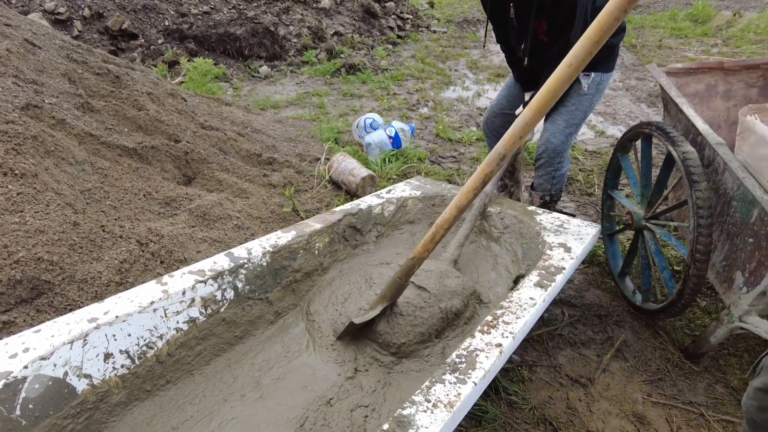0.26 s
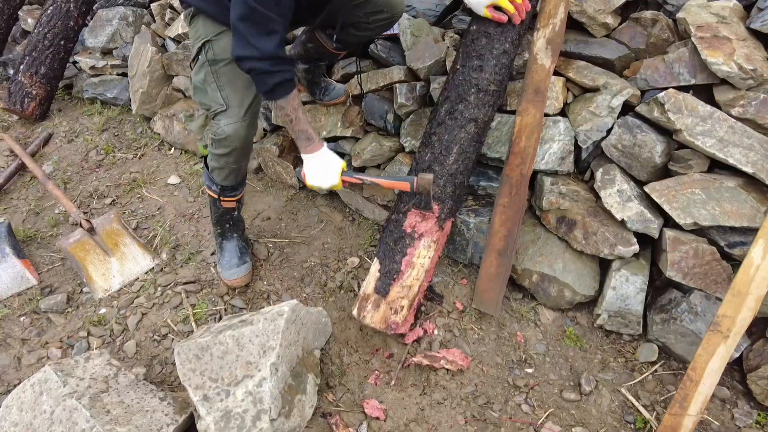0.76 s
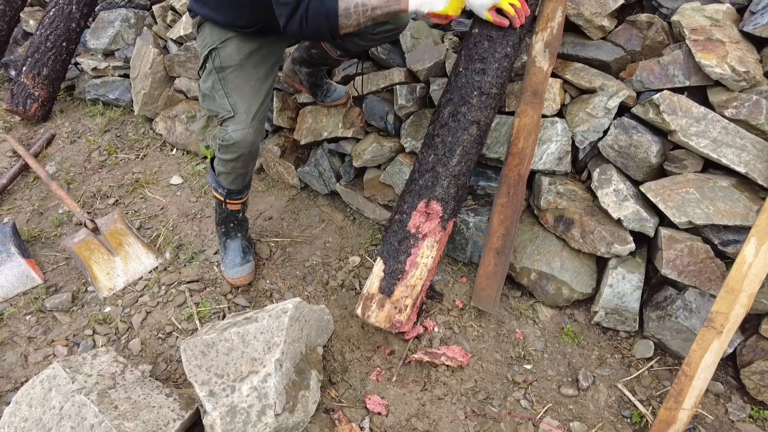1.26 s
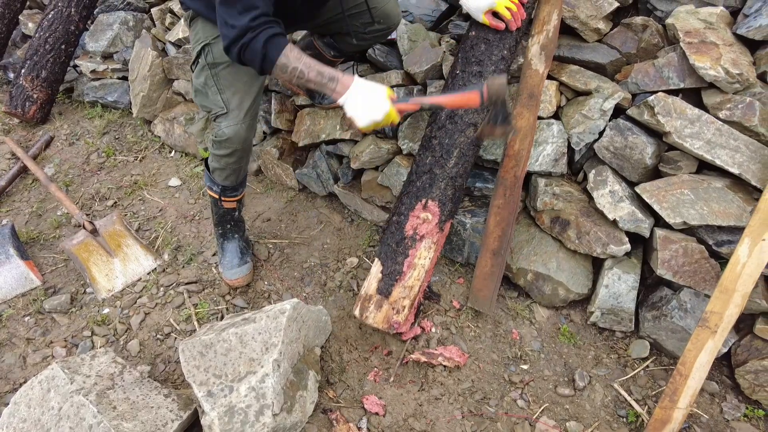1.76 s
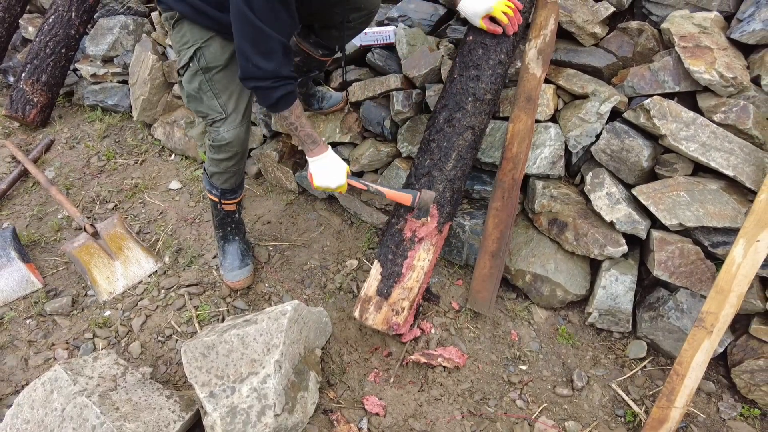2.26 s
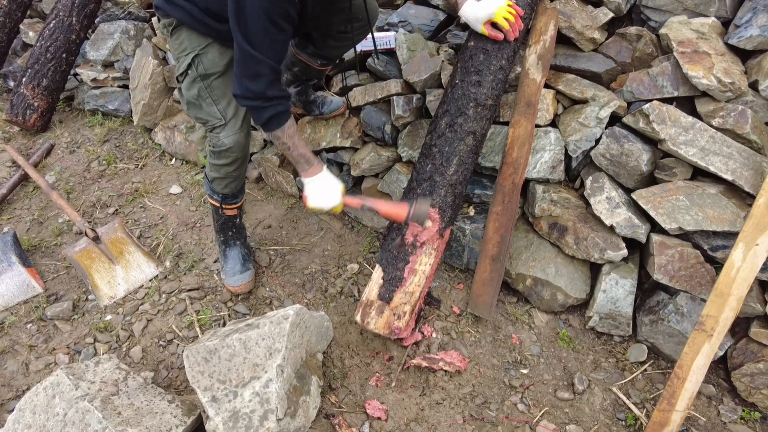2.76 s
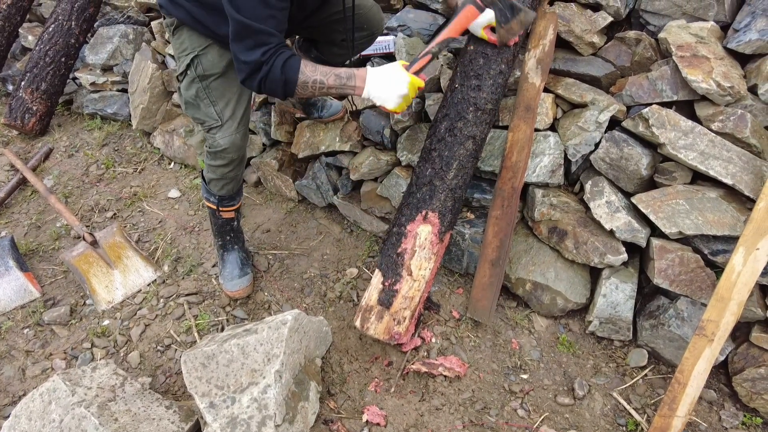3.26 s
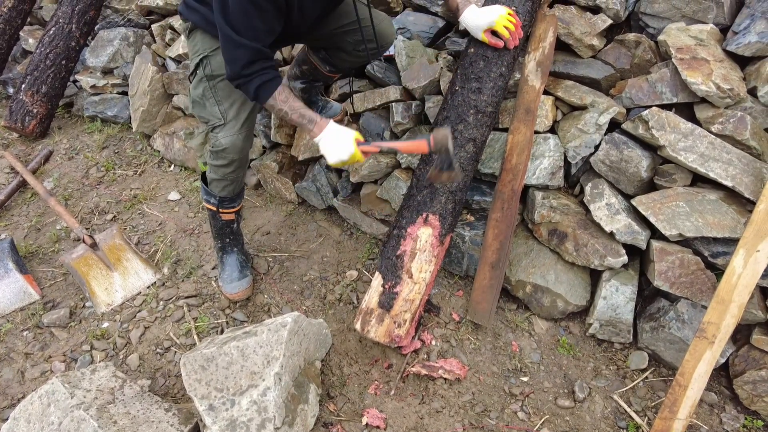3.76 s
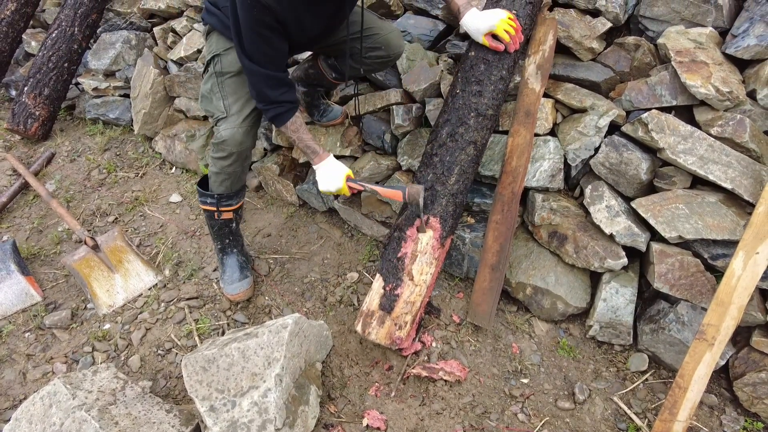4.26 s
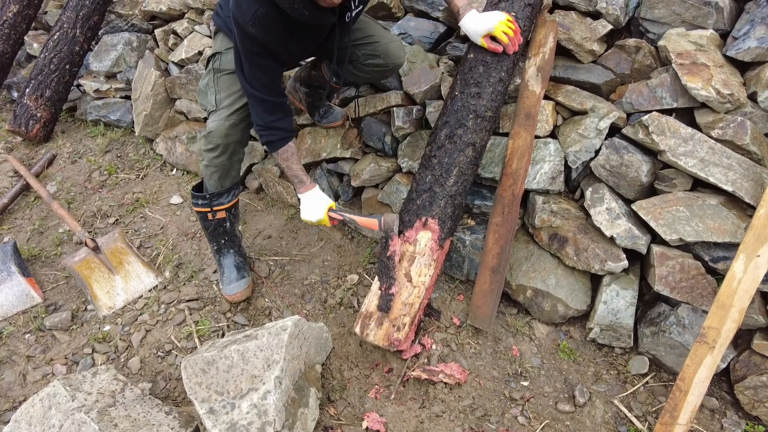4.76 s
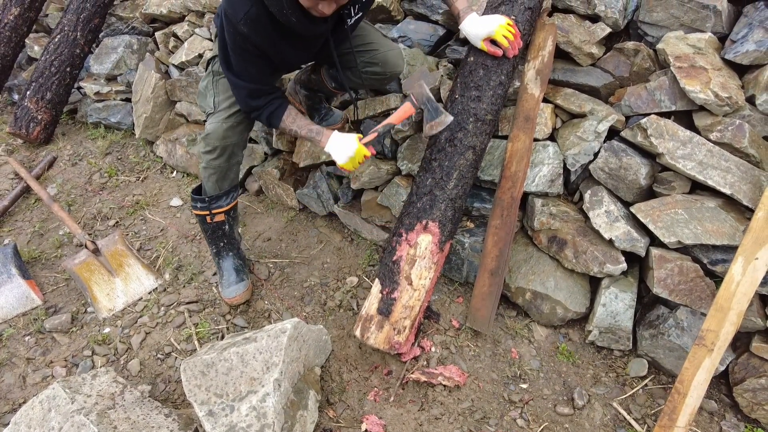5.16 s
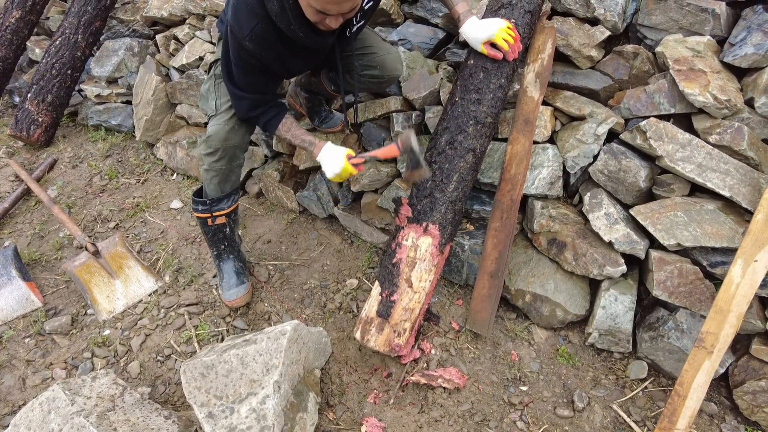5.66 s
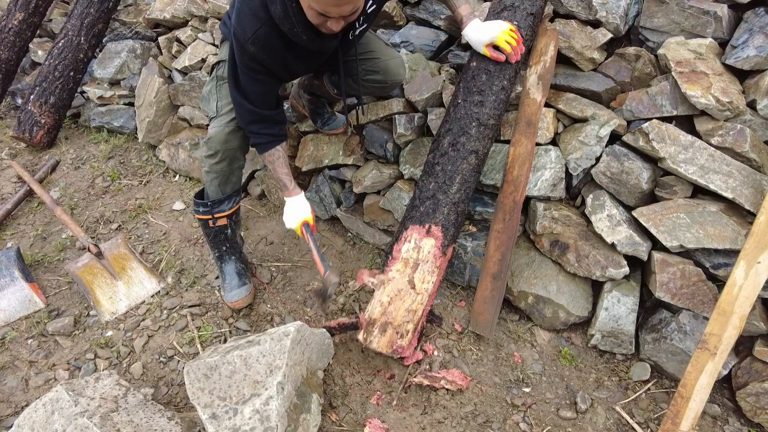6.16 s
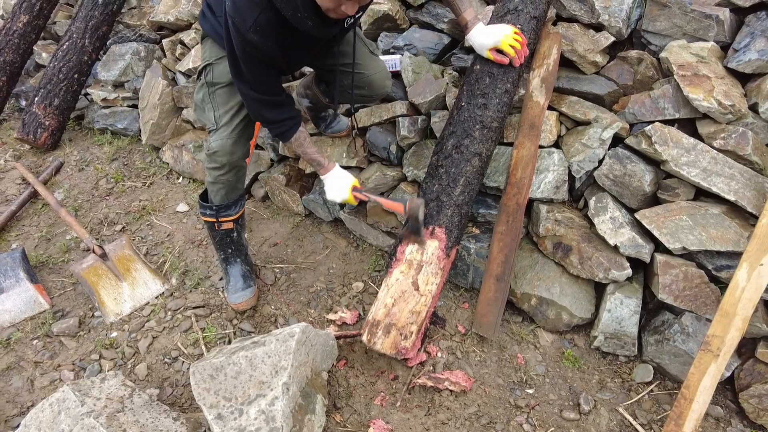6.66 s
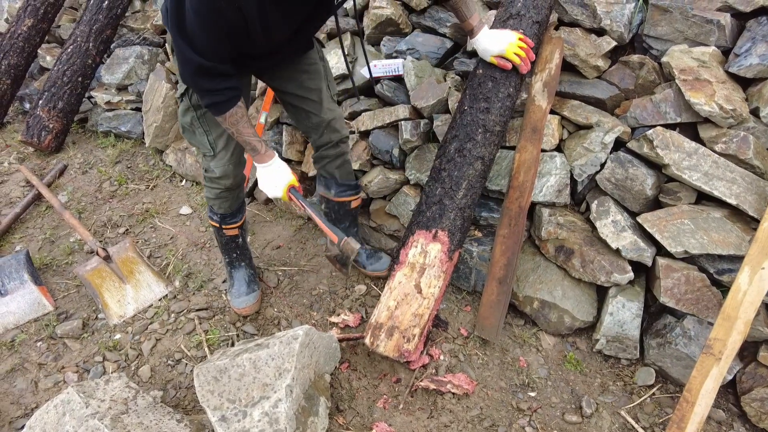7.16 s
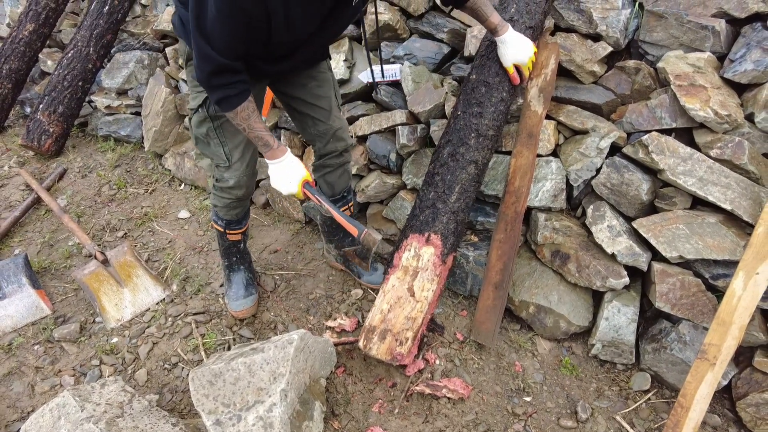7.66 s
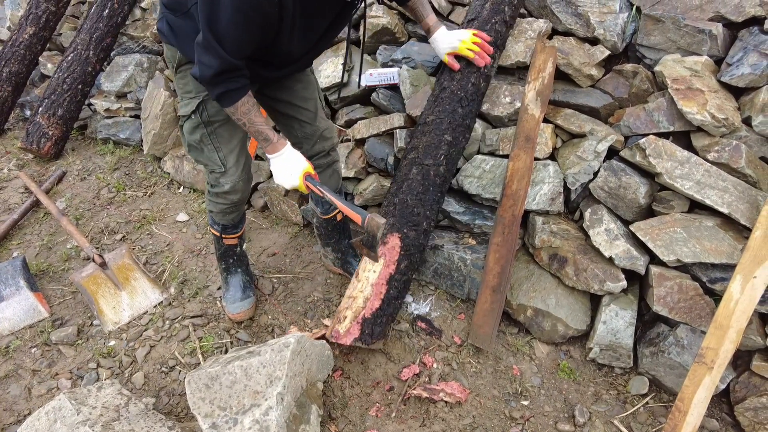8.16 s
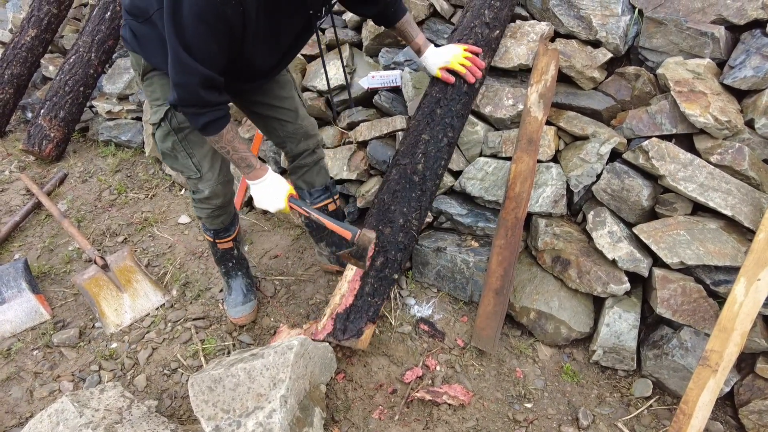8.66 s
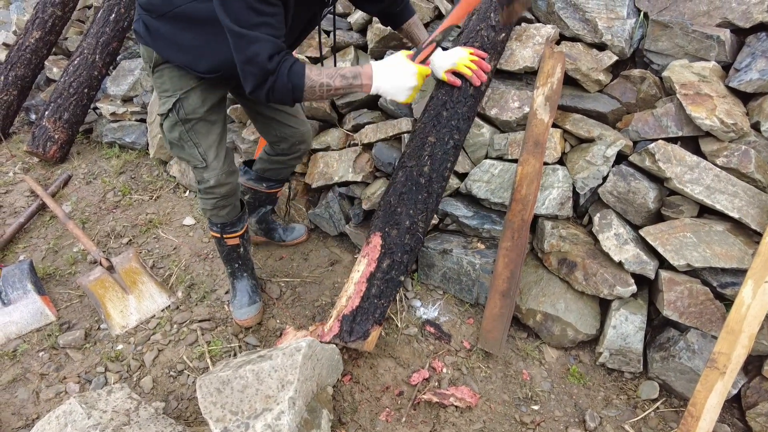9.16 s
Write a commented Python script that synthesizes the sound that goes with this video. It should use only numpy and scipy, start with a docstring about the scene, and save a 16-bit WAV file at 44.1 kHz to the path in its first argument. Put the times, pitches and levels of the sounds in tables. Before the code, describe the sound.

A brief wet scrape of cement in a tub, then a hatchet knocks bark off a log outdoors, its steel head twice ringing brightly.

```python
"""A hatchet chops bark off a log outdoors, after a short opening scene of a shovel in a steel tub of wet cement.
Each chop is a knock of ringing wood modes plus a noisy bark crunch; on stone or in a late chop the steel head rings.
Chips, crumbs, swishes and the log turning over at the end are shaped noise, as are wind and a dull background hiss.
Stones and ground scatter the sound in short noise tails; a far wall sends back one late, thin echo."""
import sys
import numpy as np
from scipy import signal
from scipy.fft import rfft, irfft, next_fast_len
from scipy.io import wavfile
from scipy.ndimage import uniform_filter1d, map_coordinates

SR = 44100
rng = np.random.default_rng(int(sys.argv[2]) if len(sys.argv) > 2 else 0)


def store_pcm(level_fs):
    """Save levels as 16-bit WAV."""
    pcm = np.round(np.clip(level_fs, -1, 1) * 32767).astype(np.int16)
    wavfile.write(sys.argv[1], SR, np.atleast_2d(pcm).T)


N = 414981


def amp(db):
    """Turns decibels into a plain multiplier."""
    return 10 ** (np.asarray(db) / 20)


def unit(x):
    """Scales a sound to an rms of 1."""
    return x / np.sqrt(np.mean(x ** 2) + 1e-20)


def along(points, hz):
    """Reads a curve of (pitch_hz, value) points on a log pitch axis."""
    f, v = np.transpose(points)
    return np.interp(np.log(hz + 1), np.log(f + 1), v)


def curves(rows):
    """One value per sample for each column after the time."""
    s, *cols = np.transpose(rows)
    return [np.interp(np.arange(N) / SR, s, c) for c in cols]


def wobble(rate, size=N):
    """A smooth random curve with rate knots a second."""
    knots = rng.standard_normal(int(size * rate / SR) + 4)
    return map_coordinates(knots, [np.arange(size) * rate / SR])


def filtered(x, response):
    """Multiplies the spectrum of x by a response of frequency."""
    m = next_fast_len(len(x) + 8192)
    hz = np.fft.rfftfreq(m, 1 / SR)
    return irfft(rfft(x, m) * response(hz), m)[:len(x)]


def hiss(spectrum, size=N, grain_db=3, grain_rate=800, patchy_db=0):
    """Coloured noise of rms 1, broken into grains in time and, if asked, into patches of pitch."""
    noise = amp(grain_db * wobble(grain_rate, size)) * rng.standard_normal(size)
    if patchy_db:
        z = signal.stft(noise, nperseg=256)[2]
        field = uniform_filter1d(rng.standard_normal(z.shape), size=4, axis=0)  # blur over pitch
        field = uniform_filter1d(field, size=14, axis=1)  # blur over time
        noise = signal.istft(z * amp(patchy_db * unit(field)), nperseg=256)[1][:size]
    return unit(filtered(noise, lambda hz: amp(along(spectrum, hz))))


def ring(modes, t, scatter_db, detune=0):
    """Fading sine tones, each at a new strength and, if asked, a slightly new pitch."""
    total = 0
    for hz, db, t60 in modes:
        strength = amp(db + rng.normal(0, scatter_db) - 60 * t / t60)
        total = total + strength * np.sin(2 * np.pi * hz * rng.normal(1, detune) * t)
    return total


def add(track, s, sound):
    """Mixes a sound in at time s."""
    part = track[round(s * SR):][:len(sound)]
    part += sound[:len(part)]


# cement sliding along the tub: time_s, rumble_db, grit_db
TUB = [(0, -43, -55), (.06, -52.5, -63), (.2, -56, -67), (.36, -59.5, -67.5), (.45, -61.5, -68.5),
       (.575, -50, -59.5)]
# tone of the rumble, then of the sandy grit: pitch_hz, relative_level_db
SLURRY = [(40, -18), (134, -10.5), (216, 0), (340, -5), (640, -23), (1200, -51)]
GRIT = [(350, -43.5), (700, -5), (2800, -9.5), (4000, -16.5), (8400, -21), (16000, -47.5)]
# a brief narrow hiss near 6 kHz: pitch_hz, width_hz, level_db (before the response is squared)
NARROW_HISS = [(5850, 1000, 3.5), (7680, 520, -6.5)]
# a grain of gravel snaps under the blade: start_s, level_db
TUB_TICKS = [(0.303, -44.5), (0.466, -47.5)]
CUT_S = .576  # the tub scene ends and the log scene begins


def tub():
    """Thick mix rumbles on the steel, sand grits under the blade, with a brief narrow hiss near 6 kHz."""
    rumble_db, grit_db = curves(TUB)
    rumble = amp(rumble_db) * hiss(SLURRY, grain_db=2.0, grain_rate=120)
    grit = amp(grit_db) * hiss(GRIT, grain_db=1, grain_rate=120, patchy_db=3.5)

    def resonances(f):
        peaks = [amp(db) * f * w / (c * c - f * f + 1j * f * w) for c, w, db in NARROW_HISS]
        return sum(peaks) ** 2

    swell = np.exp(-((np.arange(N) / SR - .502) / 0.0244) ** 2)
    narrow = swell * unit(filtered(rng.standard_normal(N), resonances))
    mix = rumble + grit
    t = np.arange(SR // 50) / SR
    for s, db in TUB_TICKS:
        snap = hiss([(300, 0), (3000, -6), (16000, -20)], len(t))
        add(mix, s, amp(db) * np.exp(-t / .0012) * snap)
    return (mix + amp(-50.5) * narrow) * (np.arange(N) < CUT_S * SR)


# tone of the wind lumps, then of the dull background hiss, nearly empty above 13 kHz:
# pitch_hz, relative_level_db
BUFFET = [(9, -30), (15, 6.5), (45, 2), (80, -5.5), (130, -44.5)]
DULL_HISS = [(70, -12), (130, 1.5), (550, -1.5), (1300, -8.5), (2800, -13), (4000, -20), (9000, -27),
             (12500, -41.5), (14000, -75.5)]


def background():
    """Wind makes low, uneven lumps of noise on the microphone; a patchy, dull hiss lies under the log scene."""
    drift_db = 1.8 * wobble(4)
    dull = amp(-73.5 + drift_db) * hiss(DULL_HISS, grain_db=2.0, grain_rate=71, patchy_db=1.5)
    lumps = amp(2.5 * wobble(7))
    gust = amp(-69.0) + amp(-56.0) * np.exp(-np.arange(N) / SR / .06)  # strongest at the very start
    wind = gust * unit(lumps * hiss(BUFFET, grain_db=-0.5))
    return dull * (np.arange(N) >= CUT_S * SR) + wind


# blows on the log: start_s, deep_knock_db, high_knock_db, crunch_db, bite_length_s
CHOPS = [(0.82, -18, -14.5, -14, 0.0025), (1.502, -25, -27.5, -34.5, 0.012),
         (1.512, -19.5, -13, -25.5, 0.0028), (2.208, -12.5, -12, -20.5, 0.0042),
         (2.833, -27, -21.5, -34.5, 0.011), (2.84, -32.5, -24.5, -43, 0.015),
         (2.862, -38, -39.5, -45, 0.0082), (3.538, -26, -20, -26, 0.0044), (4.212, -24, -18.5, -23, 0.0038),
         (4.799, -29, -19, -29.5, 0.0085), (5.348, -36.5, -23.5, -34.5, 0.011),
         (5.983, -27, -24.5, -35.5, 0.011), (6.009, -43.5, -21.5, -30.5, 0.0021),
         (6.748, -24.5, -34.5, -54, 0.0038)]
# tones of the log: pitch_hz, relative_level_db, fade_by_60_db_s
LOG = [(265, -12.5, 0.12), (448, 5, 0.062), (611, 4, 0.045), (850, -7, 0.057), (883, -8.5, 0.015),
       (1138, -6, 0.0072), (1354, -6, 0.01)]
# tone of torn bark, of sharp splinters and of the jolt on the ground: pitch_hz, relative_level_db
BARK = [(300, -19), (1000, -5.5), (3000, -4), (5000, -9), (16000, -44)]
SPLINTER = [(3000, -34), (6000, 3), (9000, -1), (12000, -19), (16000, -32.5)]
THUD = [(40, -20), (110, 1), (250, -5), (600, -34)]
# hatchet head, grouped as low ring, long ring, high ring: pitch_hz, relative_level_db,
# fade_by_60_db_s (when nothing chokes or damps it)
HEAD = [
    [(2935, -1, 0.55), (3100, -6.5, 0.3), (3450, -4.5, .4), (3570, -3.5, 0.18)],
    [(5293, -3, .95)],
    [(4170, 3.5, .025), (7050, -5, 0.043), (7720, -8.5, 0.34), (9200, -10.5, 0.5), (9306, -6, 0.5),
     (14460, -18.5, .3)],
]
SPLINTER_DB, SPLINTER_GROWS = -18.5, .8  # splinters grow more slowly than the crunch
CLINK_DB, CLINK_S = -11, 0.0071  # the head's low ring, choked by the wood
THUD_DB, THUD_S = -23, 0.017  # level under the deep knock, decay time


def chops():
    """The blade shoves the log unevenly for the length of the bite while the bark tears."""
    out, t = np.zeros(N), np.arange(SR // 5) / SR
    deep = [m for m in LOG if m[0] < 850]
    high = [m for m in LOG if m[0] >= 850]
    for s, deep_db, high_db, crunch_db, bite in CHOPS:
        tear = np.exp(-t / bite) + amp(-23) * np.exp(-t / (4 * bite))
        tear = tear * (1 - np.exp(-t / (0.56 * bite)))
        # the trunk takes up the blow over the bite
        body = (1 - np.exp(-t / (.7 * bite))) * ring(deep, t, 3, 0.018)
        thud = (1 - np.exp(-t / 0.0046)) * np.exp(-t / THUD_S) * hiss(THUD, len(t), grain_db=-1)
        body = body + amp(THUD_DB) * thud
        # many small breaks, each exciting the high tones
        breaks = tear ** 2 * rng.standard_normal(len(t))
        fibres = signal.fftconvolve(breaks, ring(high, t, 2.3, 0.025))[:len(t)]
        fibres = fibres / np.abs(fibres).max()
        bark = amp(crunch_db) * hiss(BARK, len(t))
        bark += amp(SPLINTER_DB + SPLINTER_GROWS * crunch_db) * hiss(SPLINTER, len(t))
        clink = (1 - np.exp(-t / 0.00092)) * np.exp(-t / CLINK_S) * ring(HEAD[0], t, 2.5)
        clink = amp(crunch_db + CLINK_DB) * clink
        add(out, s, amp(deep_db) * body + amp(high_db) * fibres + tear * bark + clink)
    return out


# scatter from stones and ground: pitch_hz, fade_by_60_db_s
YARD = [(200, 0.21), (2000, 0.16), (12000, 0.034)]


def yard(x):
    """Stones and ground scatter the sound into a fading noise tail, a new one every third of a second."""
    out, step = np.zeros(N), SR // 3
    for i in range(0, N, step):
        hz, t, z = signal.stft(rng.standard_normal(step), SR, nperseg=256)
        fade = amp(-60 * t / along(YARD, hz)[:, None])
        tail = signal.istft(z * fade, SR, nperseg=256)[1]
        tail = tail / np.linalg.norm(tail)
        add(out, i / SR + .004, signal.fftconvolve(x[i:i + step], tail))
    return out


# tone of the far wall's echo: pitch_hz, relative_level_db
WALL = [(600, -14), (4000, -5), (9000, 0.5)]
WALL_S, WALL_DB, WALL_SMEAR_S = .104, -29.5, 0.0057  # echo delay, strength, blur from the rough face


def wall(x):
    """A far, rough wall returns one late, thin, slightly blurred echo."""
    blur = np.exp(-np.arange(SR // 20) / SR / WALL_SMEAR_S) * rng.standard_normal(SR // 20)
    delayed = np.pad(x, (round(WALL_S * SR), 0))
    late = signal.fftconvolve(delayed, blur / np.linalg.norm(blur))[:N]
    return amp(WALL_DB) * filtered(late, lambda hz: amp(along(WALL, hz)))


# chips, pebbles and soft thuds: start_s, level_db (before attack and fade), pitch_hz
CHIPS = [(0.959, -37.5, 280), (1.55, -50, 910.3), (2.539, -48, 348), (2.606, -52.5, 1120),
         (2.974, -48, 1100), (3.185, -52, 508), (3.222, -53, 1260), (3.324, -56.5, 409),
         (3.288, -47.5, 172), (3.394, -53.5, 490), (3.42, -53, 1430), (5.413, -42, 920),
         (6.048, -49.5, 1950), (6.073, -33, 296), (6.099, -39.5, 355), (6.133, -42, 370), (6.804, -38, 676),
         (6.954, -60, 2900), (7.199, -35, 216), (8.138, -53, 1995), (8.175, -39, 952), (8.203, -56, 650),
         (8.265, -55.5, 646), (8.471, -60, 4970), (8.497, -44.5, 700), (8.649, -62, 1500),
         (8.747, -64, 6300), (8.815, -64, 2004), (9.084, -51.5, 177.2), (9.127, -54, 171)]
CHIP_TICK_DB = -27  # the tick under the note


def chips():
    """Each falling piece gives a short dull note, longer when low, with a faint tick on top."""
    out, t = np.zeros(N), np.arange(SR // 6) / SR
    for s, db, hz in CHIPS:
        spectrum = [(hz / 10.0, -22), (hz, 0), (hz * 2.5, -20), (16000, -70)]
        note = hiss(spectrum, len(t), grain_db=3.5)
        tick = amp(CHIP_TICK_DB) * hiss(BARK, len(t))
        t60 = .022 + 11 / hz
        add(out, s, amp(db - 60 * t / t60) * (1 - np.exp(-t / 0.000716)) * (note + tick))
    return out


# crumbs trickling after a blow: middle_s, level_db, pitch_hz
TRICKLES = [(0.98, -66.5, 4480), (1.0, -64.5, 440.7), (1.72, -60, 3790), (2.397, -62, 488),
            (3.09, -67, 3300), (3.248, -66, 950), (4.927, -70.5, 990), (7.268, -62.5, 601),
            (7.24, -72.5, 3505)]
# short scrapes and swishes as the blade and sleeve pull back: middle_s, level_db, pitch_hz
SWISHES = [(2.382, -69, 4843), (3.69, -73, 9140), (3.74, -77, 7130), (4.409, -71, 5940), (5.022, -73, 6480),
           (5.41, -69.5, 3040), (5.618, -73.5, 4000), (6.42, -80.5, 4280), (6.894, -76, 8000)]
# the log is turned over on gravel: time_s, level_db
ROLL = [(7.6, -92), (7.75, -73), (8.05, -68.5), (8.3, -74), (8.6, -66.5), (8.75, -66), (8.86, -81.5)]
# tone of that scuffing: pitch_hz, relative_level_db
SCUFF = [(60, -13.5), (300, 0.5), (900, -4.5), (3000, -16), (8000, -23), (16000, -60.5)]
TRICKLE_HALF_S, SWISH_HALF_S = 0.11, 0.06  # from the middle of a swell to 1/e of its peak


def rustles():
    """Each movement is a swell of fine grains around its pitch; the turning log scuffs in coarser ones."""
    out = amp(curves(ROLL)[0]) * hiss(SCUFF, grain_db=3.5, grain_rate=260, patchy_db=3.5)
    for rows, half in (TRICKLES, TRICKLE_HALF_S), (SWISHES, SWISH_HALF_S):
        reach = round(2.5 * half * SR)
        t = np.arange(-reach, reach) / SR
        for s, db, hz in rows:
            spectrum = [(hz / 5, -12), (hz, 0), (hz * 2.2, -7), (hz * 7, -36)]
            grains = hiss(spectrum, len(t), grain_db=3.5, grain_rate=360, patchy_db=3)
            add(out, s + t[0], amp(db) * np.exp(-(t / half) ** 2) * grains)
    return out


# the steel head rings, on stone or in a late chop: start_s, crack_db, low_ring_db, long_ring_db,
# high_ring_db, drag_loss_db (taken from the long ring while the blade drags)
HEAD_RINGS = [(1.572, -23.5, -18, -42, -14, -5), (1.581, -42, -32, -25, -24, 0),
              (1.591, -22.5, -30, -34, -19, -2), (2.917, -15, -20.5, -18.5, -41, -5.5),
              (2.9343, -20.5, -19, -31, -26.5, -24), (6.121, -56, -62, -68, -47, -42),
              (6.748, -60, -43, -49, -55, 0), (6.767, -47, -52, -70, -57, -12)]
# tone of the crack at each ring's start: pitch_hz, relative_level_db
CRACK = [(200, -16.5), (600, 9), (1300, 6.5), (3000, -15.5), (6000, -19), (16000, -47.5)]
# the blade brushes past or leaves the wood and sings faintly: start_s, ring_db
BRUSHES = [(1.527, -54.5), (3.2, -59.5), (3, -62.5), (6.143, -67)]
LOW_CHOKE_S, HIGH_CHOKE_S, LINGER_DB = 0.0074, 0.0081, -31  # these rings drop fast, a little lingers
DRAG_S = .018  # time for a drag to take its full loss
BRUSH_DAMPING_DB_PER_S = 49.5  # on top of the head's own fading
GROUND_DB, SWAY_S = -10, .0007  # the ring's bounce off the ground; how far its path shifts


def head_rings():
    """Each contact cracks and excites the steel head; dragging damps the long ring, biting wood damps all."""
    steel, cracks = np.zeros((3, N)), np.zeros(N)
    t, clock = np.arange(round(1.5 * SR)) / SR, np.arange(N) / SR
    drag_db = sum(min(row[-1], 0) * np.clip((clock - row[0]) / DRAG_S, 0, 1) for row in HEAD_RINGS)
    wood_db = -35 * np.searchsorted(np.transpose(CHOPS)[0], clock)  # every chop takes another 35 dB
    losses = wood_db, wood_db + drag_db, wood_db

    def since(s, lost_db):
        """Loss gathered after time s."""
        start = round(s * SR)
        return lost_db[start:][:len(t)] - lost_db[start]

    low_hold = np.exp(-t / LOW_CHOKE_S) + amp(LINGER_DB)
    high_hold = np.exp(-t / HIGH_CHOKE_S) + amp(LINGER_DB)
    holds = low_hold, 1, high_hold
    short = t[:SR // 10]
    grind = np.exp(-short / 0.0011) + amp(-11.5) * np.exp(-short / 0.014)
    for s, crack_db, *levels_db, _ in HEAD_RINGS:
        for track, db, group, hold, lost_db in zip(steel, levels_db, HEAD, holds, losses):
            tone = hold * (1 - np.exp(-t / .0005)) * ring(group, t, 1.5)
            add(track, s, amp(db + since(s, lost_db)) * tone)
        scrape = amp(crack_db) * hiss(CRACK, len(short))
        scrape += amp(levels_db[-1] - 7.0) * hiss(SPLINTER, len(short))
        scrape += amp(levels_db[0] - 7.0) * hiss(BARK, len(short))
        add(cracks, s, grind * scrape)
    for s, db in BRUSHES:
        song = ring(HEAD[1], t, 1.8) + amp(-7) * ring(HEAD[2], t, 1.5)
        level = amp(db + since(s, losses[1]) - BRUSH_DAMPING_DB_PER_S * t)
        add(steel[1], s, level * (1 - np.exp(-t / 0.0024)) * song)
    # the head turns in the swing, so each ring flutters
    turning = amp([2 * wobble(90) for _ in steel])
    rings = (steel * turning).sum(0)
    # its distance changes, which bends the pitch a little
    travel = np.arange(N) + .00012 * SR * wobble(12)
    # a second, shifting path off the ground beats against the first
    bounce = np.arange(N) - SR * (.003 + SWAY_S * wobble(6))
    direct = map_coordinates(rings, [travel])
    return direct + amp(GROUND_DB) * map_coordinates(rings, [bounce]) + cracks


def scene():
    """Tub and log sounds together; only wood, chips and steel reach the yard and the wall."""
    wood, steel = chops() + chips(), head_rings()
    scatter = yard(amp(-27.5) * wood + amp(-27.0) * steel)
    echo = wall(wood + steel)
    return (tub() + background() + wood + scatter + echo + rustles() + steel)[None]


TOP_HZ = 16100


def record(dry):
    """Removes everything from TOP_HZ upward."""
    return filtered(dry[0], lambda hz: hz < TOP_HZ)[None]


dry = scene()
out = record(dry)
store_pcm(out)
```